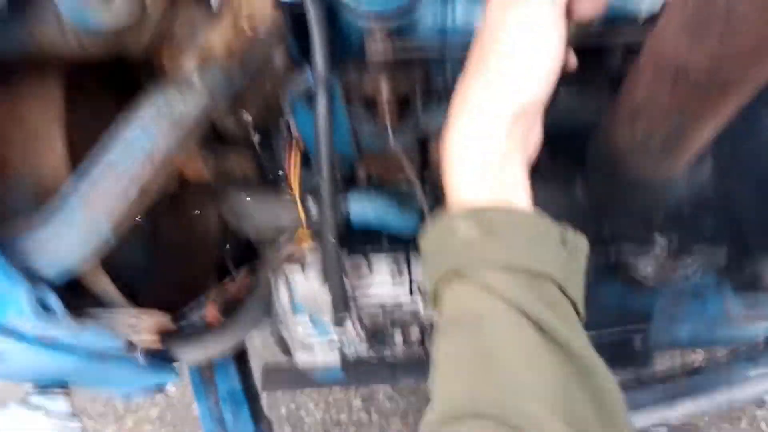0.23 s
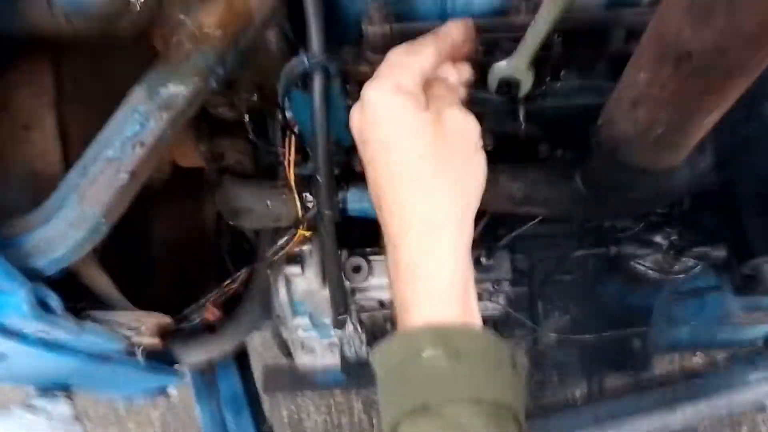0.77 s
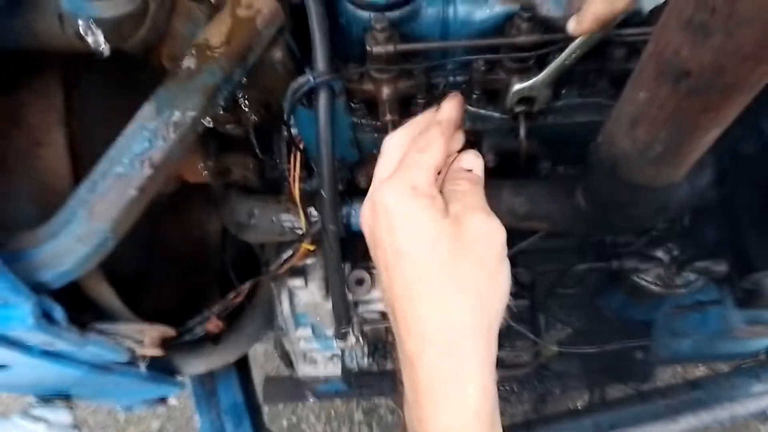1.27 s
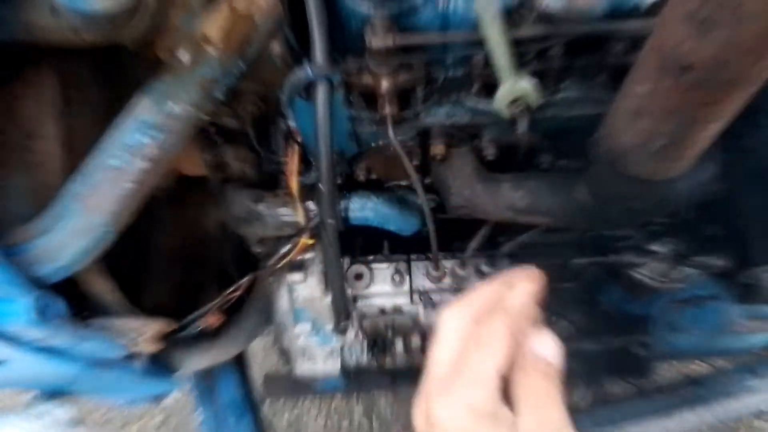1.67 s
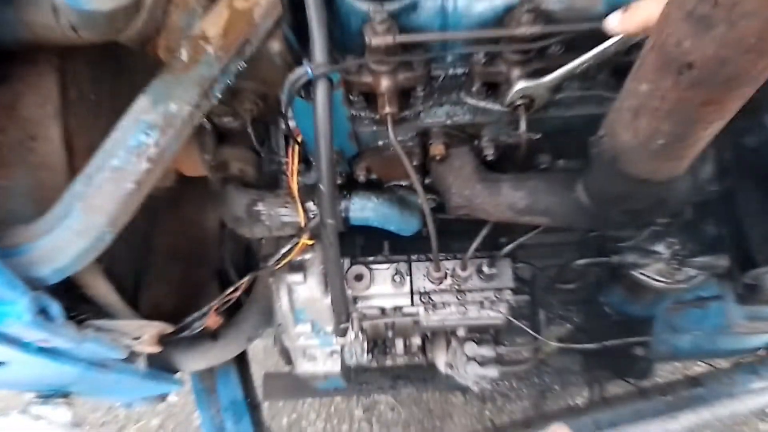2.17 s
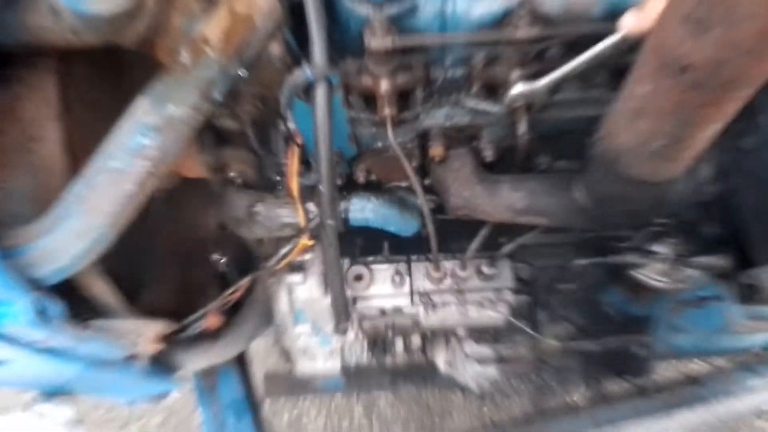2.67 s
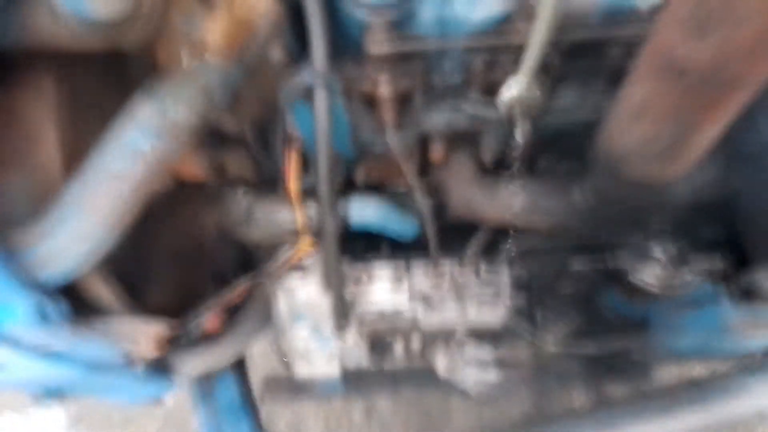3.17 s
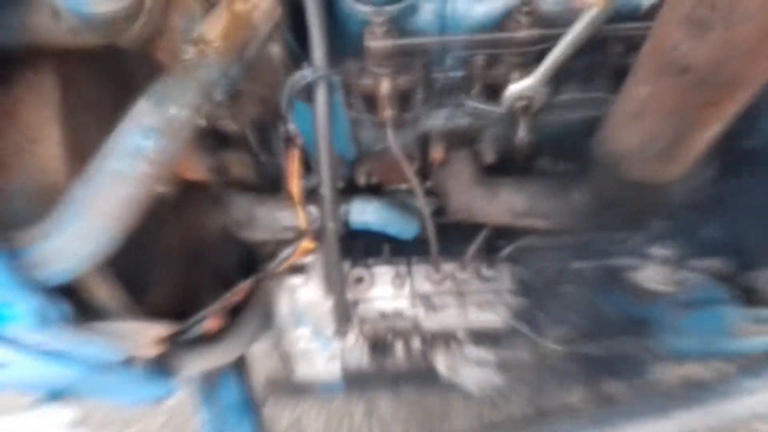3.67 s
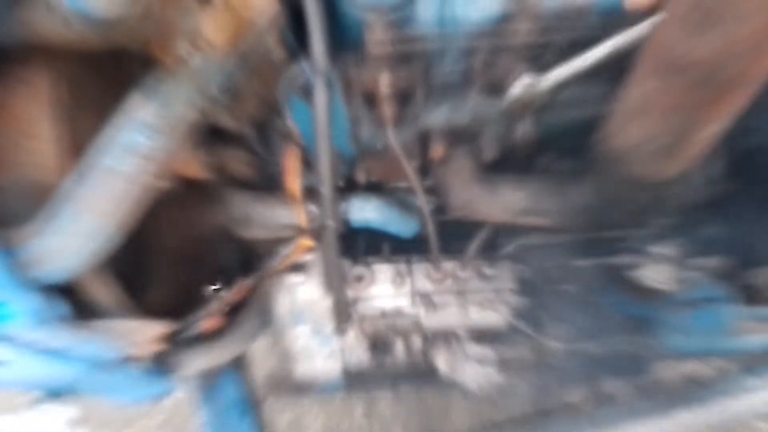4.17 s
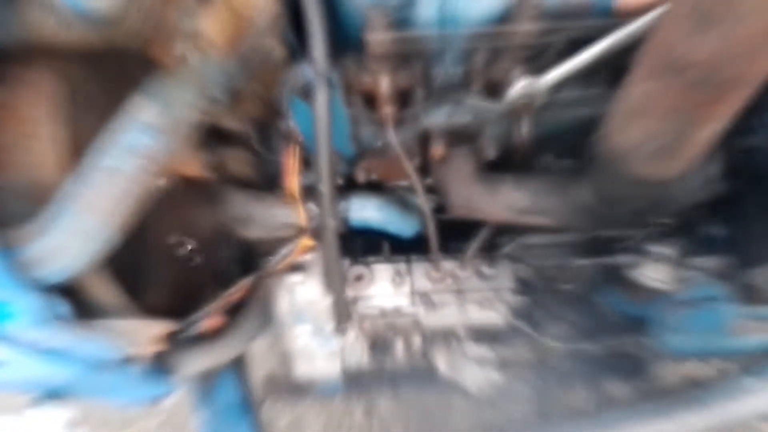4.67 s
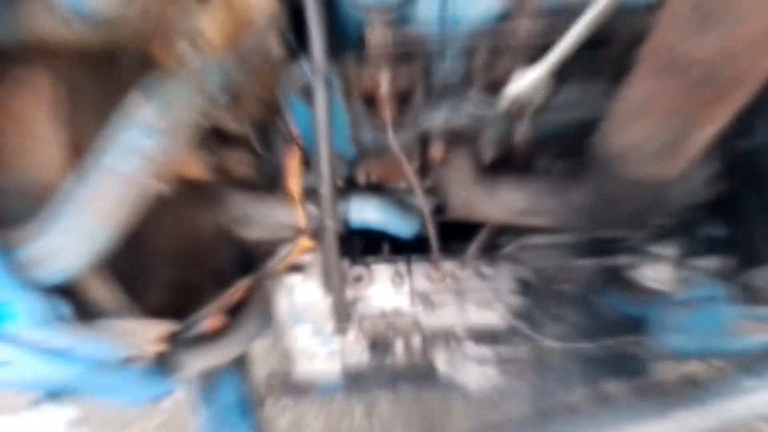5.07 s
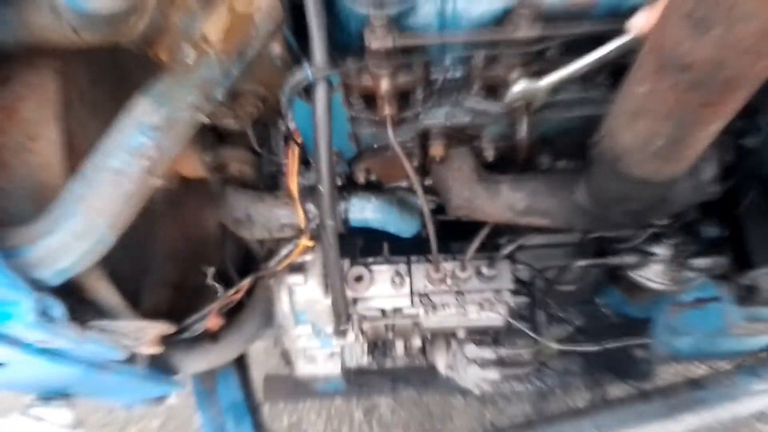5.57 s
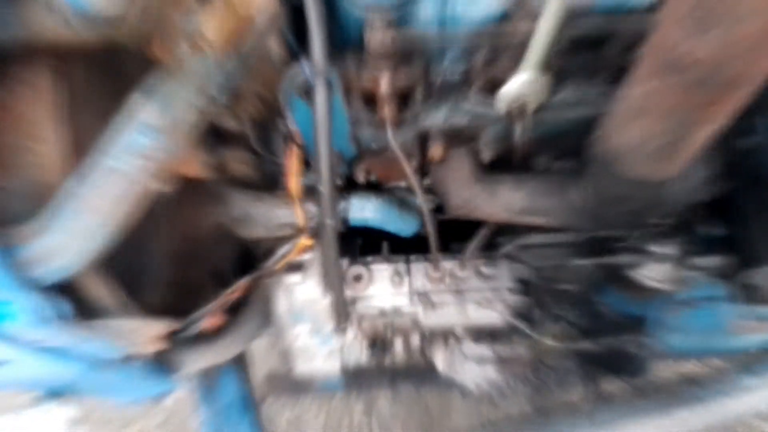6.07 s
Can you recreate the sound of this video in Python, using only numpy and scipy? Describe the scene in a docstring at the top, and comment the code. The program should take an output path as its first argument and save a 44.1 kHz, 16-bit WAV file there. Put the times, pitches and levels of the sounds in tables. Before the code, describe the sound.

A cold diesel catches on some cylinders: lopsided pairs of hard metallic clacks and hissy spits of fuel and gas, about three or four cycles a second. It accelerates steadily, with hollow knocks, pump housing rings and exhaust thumps crowding together. Then it hammers at nearly ten cycles a second, loose parts rattling, before dropping back a little. Handheld phone very close, no echo, slightly compressed treble.

```python
"""Old diesel starting, close up

A three-cylinder diesel catches on some cylinders, gathers speed and settles to idle, an arm's length from a phone.
In every cycle each cylinder clacks, spits gas and fuel and thumps the exhaust: shaped noise and struck modes.
Ignition knocks and pump rings strike modes at listed times; casing roar, loose parts and rumble run underneath.
Each of the two microphone ports has its own treble resonance."""
import sys
import numpy as np
from scipy import signal
from scipy.fft import rfft, irfft
from scipy.io import wavfile
from scipy.ndimage import uniform_filter1d

SR = 44100
rng = np.random.default_rng(int(sys.argv[2]) if len(sys.argv) > 2 else 0)


def dump(signal):
    """Clip the signal to [-1, 1] and save it as 16-bit WAV at the path in sys.argv[1]."""
    limited = np.clip(np.atleast_2d(signal).T, -1, 1)
    pcm = np.round(limited * 32767).astype(np.int16)
    wavfile.write(sys.argv[1], SR, pcm)


N = 278712

# levels in all tables are relative: each source sets its own gain afterwards
# stray ticks between strokes while the engine turns slowly: peak t/s, level/dB
TICKS = [(0.065, -29.5), (0.284, -28.5), (0.384, -30), (0.48, -25), (0.5942, -28), (0.601, -39),
         (0.691, -27.5), (0.778, -30), (0.9, -31), (0.991, -36), (1.211, -44), (1.448, -47), (1.824, -29.5)]
# steady running noise: t/s, casing roar level/dB, loose parts level/dB
RUNNING = [(0.0, -37.5, -38.5), (0.16, -45, -39), (0.28, -37, -31), (0.42, -42, -38.5), (1.67, -41, -38.5),
           (2.71, -37, -33.5), (3.08, -35.5, -29), (3.59, -32.5, -24.5), (4.4, -30, -21.5),
           (5.38, -31, -25), (6.32, -32, -24.5)]


def rattle():
    """Clacks, spits and ticks are flurries of tiny impacts: noise under blow envelopes, top treble set apart."""
    # blow shapes, a row per cylinder (one row for ticks): top treble level/dB over the blow, rise/s, length/s
    clack_shape = [(-41, 0.0027, 0.0083), (-17.5, 0.001, 0.0057), (-20, 0.0043, 0.0089)]
    spit_shape = [(-5, 0.0042, 0.0069), (-3.5, 0.0046, 0.0066), (-8.5, 0.004, 0.0088)]
    tick_shape = [(-9, 0.00037, 0.02)]
    # smear of the blows as the engine runs: t/s, added rise and length/s
    blur_s = [(0, 0.0026), (3.4, 0.00084), (4.3, 0), (4.9, 0.0075), (5.2, 0.00049), (6.32, 0)]
    # spectrum of the impacts: f/Hz, level/dB per Hz
    clatter = [(1000, 11), (2500, -0.5), (4000, -0.5), (6000, 5), (9000, 4.5), (12000, 2.5), (15000, -1.5)]
    # sharp openings: level over the blow, lead before its peak, shared length
    crack_db, crack_early_s = -1.5, 0.0025  # of a clack
    pop_db, pop_early_s = -4, 0.004  # of a spit
    opening_s = 0.0012

    (clack_s, clack_db), (spit_s, spit_db) = clacks(), spits()
    kinds = [(clack_s, clack_db, clack_shape), (spit_s, spit_db, spit_shape), (*np.transpose(TICKS), tick_shape)]
    blows = []
    for s, db, shapes in kinds:
        columns = np.broadcast_arrays(s, db, *np.transpose(shapes))
        blows.append(np.reshape(columns, (5, -1)))
    s, db, top_db, rise, length = np.hstack(blows)
    blur = np.clip(np.interp(s, *np.transpose(blur_s)), 0, 1)
    rise, length = rise + blur, length + blur

    body = bursts(s, db, rise, length, shape=1.32)
    body += undb(-24.0) * bursts(s, db, 0.0013, 0.022, shape=0.85)  # faint longer tail
    front_s = np.abs([clack_s - crack_early_s, spit_s - pop_early_s])
    front_db = np.array([clack_db + crack_db, spit_db + pop_db])
    front = bursts(front_s, front_db, 0.0004, opening_s, shape=0.76)
    body = np.hypot(body, front)
    top = undb(9.5) * bursts(s, db + top_db, rise, length, shape=1.6)
    top = np.hypot(top, undb(-1) * front)

    flurry, hail = 0, pair(grain_db=1.0)
    for hz, x in parts(colour(hail, clatter), 2603, patchy_db=3.5, rate=64):
        top_share = np.clip(np.log2(hz / 8000) / 0.18, 0, 1)
        flurry = flurry + x * ((1 - top_share) * body + top_share * top)
    return undb(-7.5) * flurry


def clacks():
    """Dull sharp valve clacks: times and levels."""
    return strokes((0, 0.345, 0.68), 0, first=1)  # share of the cycle, per cylinder


def spits():
    """Bright soft spits of leaking fuel and gas: times and levels, with a fixed lag of 3 ms."""
    return strokes((0.215, 0.55, 0.885), 0.003, first=4)


def strokes(share, late, first):
    """Times and levels of one kind of blow, cylinder after cylinder: arrays (cycles, 3)."""
    # engine cycles: start t/s, clack level/dB of cylinders 1 2 3, spit level/dB of 1 2 3
    cycles = [(-0.17, -60, -60, -43, -61, -31, -56), (0.1474, -24, -44, -47, -18.5, -22, -47),
              (0.4596, -22.5, -37, -37, -18.5, -20, -41), (0.754, -27.5, -34, -40, -26, -20.5, -53),
              (1.0387, -26, -34, -36, -18.5, -18, -61), (1.2923, -23, -28, -44, -17.5, -18.5, -54),
              (1.5268, -21.5, -28, -50, -15.5, -18, -55), (1.7428, -20, -24, -37, -17.5, -17.5, -60),
              (1.9458, -18.5, -20.5, -48, -15.5, -16.5, -59), (2.1332, -19.5, -20, -50, -28, -18.5, -61),
              (2.3156, -19, -18.5, -46, -22, -20, -56.5), (2.4944, -19, -19.5, -17, -19, -21.5, -17.5),
              (2.6647, -20, -20.5, -22, -18.5, -18.5, -16), (2.8249, -24, -17, -23, -18.5, -17.5, -23),
              (2.9642, -17, -21, -24.5, -16.5, -19, -38), (3.101, -15.5, -24, -37, -16, -19.5, -45),
              (3.2358, -17.5, -16, -31, -14.5, -22, -44), (3.367, -17.5, -21, -24, -13.5, -17.5, -34),
              (3.4949, -17.5, -17, -19.5, -15, -24, -16.5), (3.6088, -16.5, -16.5, -19.5, -18, -24, -15.5),
              (3.7306, -20, -22, -31, -14.5, -22, -46), (3.841, -16.5, -18, -27, -19, -21.5, -46),
              (3.9517, -16, -20, -24, -17, -24, -14.5), (4.058, -18, -23, -23, -22, -19.5, -14.5),
              (4.163, -15.5, -18, -18.5, -20, -22.5, -16), (4.267, -20, -25, -20, -26, -19.5, -16),
              (4.37, -21.5, -21, -22, -22, -30, -20), (4.47, -22, -23, -21, -31, -25, -21),
              (4.57, -23, -21.5, -24, -37, -32, -30), (4.67, -24, -21.5, -22, -29, -28, -37),
              (4.775, -24, -20, -24, -32, -28.5, -41), (4.878, -25, -20.5, -26, -33, -27, -43),
              (4.9812, -23, -17, -26, -36, -27, -24), (5.0874, -19, -19.5, -27, -26, -26, -28),
              (5.1959, -19.5, -18, -31, -27, -26, -46), (5.3063, -17.5, -19, -32, -27, -23, -43),
              (5.419, -17.5, -19, -34, -27, -25, -42), (5.5337, -17, -17.5, -16.5, -27, -29, -22),
              (5.65, -19.5, -17.5, -20, -22, -25, -36), (5.7649, -17.5, -18, -19.5, -18, -22, -19),
              (5.8793, -19.5, -18.5, -21, -19.5, -23, -19.5), (5.9916, -17, -18, -35, -19.5, -20.5, -46),
              (6.1027, -19, -21, -24.5, -16, -30, -44), (6.2136, -19, -17.5, -23.5, -20.5, -20.5, -60)]
    rows = np.array(cycles)
    start = rows[:, 0]
    span = np.diff(start, append=2 * start[-1] - start[-2])  # the last cycle lasts as long as the one before
    s = start[:, None] + span[:, None] * np.array(share) + late
    return np.clip(s, 0, (N - 1) / SR), rows[:, first:first + 3]


def clink():
    """Metal on metal: valve gear struck as clacks and ticks open; every blow finds its own few modes."""
    # modes of the valve gear: f/Hz, width/Hz, level/dB
    valves = [(3020, 87, -28), (3850, 68, -13.5), (4370, 70, -5), (5100, 130, -14), (5930, 75, 0.5),
              (6320, 80, -1), (7010, 140, 3), (7710, 86, 0), (8470, 66, 0), (9040, 91, 1), (9400, 97, -1.5),
              (10520, 160, -1.5), (11700, 110, -4), (12500, 130, -4)]
    clink_db, early_s = -11, 0.003  # over the blow, before the peak of a clack
    (clack_s, clack_db), (tick_s, tick_db) = clacks(), np.transpose(TICKS)
    s = np.hstack([np.abs(clack_s.ravel() - early_s), tick_s])
    db = np.hstack([clack_db.ravel(), tick_db + 3.0]) + clink_db
    return strike(s, db, valves, uneven_db=5.0, turn=0.9, rise=0.0002)


def knock():
    """Late ignition's pressure jump rings the cylinder head; the crankcase booms under blows and at listed times."""
    # ignition knocks in the cylinder head: t/s, peak level/dB, favoured ring f/Hz
    knocks = [(0.0373, -30, 2200), (0.1476, -31, 1870), (0.2537, -26.5, 2020), (0.4622, -28, 2170),
              (0.5626, -22.5, 2000), (0.858, -25.5, 2020), (1.0419, -30, 2310), (1.1268, -21.5, 2020),
              (1.2945, -29.5, 2140), (1.3443, -25.5, 1930), (1.3733, -18, 2200), (1.5214, -39, 1850),
              (1.5773, -28, 1700), (1.577, -28, 1910), (1.6003, -20.5, 2040), (1.7419, -32, 2130),
              (1.7905, -28, 1850), (1.8118, -15, 2400), (1.945, -34, 2130), (1.9929, -22, 2140),
              (2.0086, -21.5, 2380), (2.1315, -33, 1950), (2.194, -19, 2020), (2.3145, -45, 2350),
              (2.3567, -35, 2460), (2.376, -14.5, 2260), (2.5376, -29, 1920), (2.554, -13, 2400),
              (2.607, -28, 2300), (2.7187, -26, 2030), (2.803, -33, 2080), (2.8554, -29, 2210),
              (2.8703, -22, 2400), (2.9986, -22, 2340), (3.0106, -15, 2030), (3.1343, -24, 1780),
              (3.1472, -25, 2380), (3.265, -16, 2510), (3.2818, -14, 2380), (3.3964, -26, 2380),
              (3.5184, -28, 2680), (3.5763, -22, 2720), (3.5768, -20, 2440), (3.6431, -22, 2410),
              (3.6547, -22, 2440), (3.7539, -30, 2150), (3.8776, -20, 2030), (3.9759, -27, 2580),
              (3.9893, -26, 2430), (4.0248, -24, 1700), (4.0257, -17.5, 2430), (4.1312, -21, 2410),
              (4.2093, -27, 2090), (4.2348, -16, 2420), (4.3705, -23, 2360), (4.426, -24, 2600),
              (4.4367, -23.5, 1990), (4.5077, -31, 2080), (4.5356, -20, 2130), (4.6034, -32, 2350),
              (4.6355, -26, 2380), (4.8434, -30, 2410), (4.9122, -29, 2520), (5.0165, -23, 2070),
              (5.3425, -21.5, 2000), (5.4575, -19.5, 2080), (5.5727, -37, 2120), (5.6114, -27, 2420),
              (5.6757, -26, 1990), (5.6885, -26, 2410), (5.7264, -25.5, 2180), (5.8441, -21.5, 2430),
              (5.9075, -23.5, 2030), (5.9174, -19.5, 2430), (5.9555, -24, 2420)]
    # the loudest crankcase booms: t/s, peak level/dB, favoured ring f/Hz
    booms = [(0.525, -25, 900), (0.951, -29, 860), (1.098, -19.5, 1010), (1.376, -32, 904),
             (1.521, -29, 813), (1.58, -23, 1150), (1.742, -28, 918), (1.945, -28, 911), (1.988, -29, 1210),
             (2.134, -21, 870), (2.322, -24, 870), (2.374, -28, 886), (2.534, -22, 970), (2.612, -22, 845),
             (2.704, -17, 1240), (2.805, -28, 1140), (2.856, -20, 1150), (2.96, -22, 715),
             (2.995, -25, 1160), (3.053, -23, 927), (3.098, -24, 816), (3.135, -26, 673), (3.27, -23, 1210),
             (3.312, -28, 904), (3.403, -17, 1140), (3.452, -23, 721), (3.493, -27, 926),
             (3.523, -18, 1170), (3.682, -25, 1170), (3.704, -24, 832), (3.761, -19, 1170),
             (3.866, -26, 990), (3.937, -20, 853), (3.98, -19, 1030), (4.027, -25, 904), (4.194, -21, 1140),
             (4.318, -21, 837), (4.406, -19, 1190), (4.502, -25, 867), (4.814, -15.5, 1000),
             (4.869, -19, 721), (5.126, -26, 869), (5.287, -19, 826), (5.416, -34, 864), (5.535, -32, 902),
             (5.645, -30, 856), (5.684, -29, 894), (5.828, -24, 619), (5.864, -21, 818), (5.908, -20, 1120),
             (5.97, -23, 689), (6.06, -27, 931), (6.082, -28, 934), (6.21, -24, 832), (6.254, -28, 937)]
    # modes of the cylinder head: f/Hz, width/Hz, level/dB
    head_modes = [(1600, 380, 4), (1900, 71, 7), (2037, 77, 3.5), (2106, 130, 7.5), (2280, 97, 9.5),
                  (2395, 48, 4), (2510, 82, -6.5)]
    # modes of the crankcase: f/Hz, width/Hz, level/dB
    case_modes = [(705, 54, 2), (835, 49, 2.5), (909, 38, 2.8), (997, 60, 3.4), (1159, 122, 9.9),
                  (1280, 160, 4)]
    # boom over each blow, per cylinder, and its spread
    on_clack_db, on_spit_db, spread_db = (-13, -12.5, -30), (-12.5, -15, -27), 2
    rebound_s, rebound_db = 0.0085, -10.5  # the piston slaps back: lag, level over the knock

    (s, db, hz), (loud_s, loud_db, loud_hz) = np.transpose(knocks), np.transpose(booms)
    (clack_s, clack_db), (spit_s, spit_db) = clacks(), spits()
    boom_s = np.hstack([clack_s.ravel(), spit_s.ravel()])
    boom_db = np.hstack([scatter(clack_db + on_clack_db, spread_db), scatter(spit_db + on_spit_db, spread_db)])
    hail = pair(grain_db=1.5)

    head = undb(-9.0) * ring(hail * bursts(s + 0.0032, db, 0.0015, 0.013, shape=0.58), head_modes)
    hit_s = np.hstack([s, s + rebound_s])
    hit_db = np.hstack([db, scatter(db + rebound_db, 2.0)])
    head += undb(-1.5) * strike(hit_s, hit_db, head_modes, uneven_db=-0.5, turn=1.0, rise=0.0012,
                                near_hz=np.hstack([hz, hz]))

    case = undb(-8.5) * ring(hail * bursts(boom_s + 0.0026, boom_db, 0.0017, 0.013, shape=0.98), case_modes)
    case += undb(-6.5) * strike(boom_s, boom_db, case_modes, uneven_db=3.0, turn=0.52, rise=0.0022)
    case += undb(-3.0) * strike(loud_s, loud_db, case_modes, uneven_db=-1.0, turn=0.28, rise=0.0018,
                                near_hz=loud_hz)
    return head + case


def exhaust():
    """Gas pulses ring the pipe and gush on for a moment; every spit thumps a little."""
    # the loudest exhaust thumps: t/s, peak level/dB, favoured ring f/Hz
    thump_list = [(0.111, -26.5, 503), (0.215, -20, 302), (0.268, -25.5, 420), (0.523, -23, 304),
                  (0.723, -36, 326), (1.299, -32, 350), (1.41, -31, 334), (1.533, -34, 345),
                  (1.573, -30, 269), (1.637, -28.5, 326), (1.79, -34, 320), (1.915, -35, 366),
                  (1.993, -27, 334), (2.108, -37, 338), (2.198, -30, 331), (2.323, -32, 339),
                  (2.474, -32, 363.5), (2.535, -24, 333), (2.744, -33, 342), (2.792, -35, 326),
                  (2.851, -33, 269), (2.996, -25, 355), (3.134, -23, 339), (3.271, -26, 343),
                  (3.323, -24, 347), (3.404, -28, 355), (3.451, -27, 361), (3.588, -26, 323),
                  (3.636, -27, 388), (3.71, -27, 355), (3.862, -31, 301), (4.042, -25, 342),
                  (4.087, -26, 393), (4.19, -19, 366), (4.292, -24, 312), (4.51, -31, 347),
                  (4.616, -24, 347), (4.895, -31, 571), (5.131, -30, 466), (5.234, -39, 310),
                  (5.29, -27, 358), (5.554, -27, 374), (5.679, -24, 340), (5.746, -33, 256),
                  (5.79, -22, 302), (5.859, -30, 275), (5.905, -28, 345), (5.973, -29, 339),
                  (6.13, -27.5, 326), (6.245, -23, 343)]
    # modes of the exhaust pipe: f/Hz, width/Hz, level/dB
    pipe = [(278, 44, 4.1), (331, 46.5, 5.9), (396, 60, 5.5), (454, 80, 3.7), (518, 79, 4.5)]
    (spit_s, spit_db), (loud_s, loud_db, loud_hz) = spits(), np.transpose(thump_list)
    s, db = spit_s.ravel(), scatter(spit_db - 13.5, 2.5)
    gush_s = np.hstack([s, loud_s]) + 0.0014
    gush_db = np.hstack([db, loud_db])
    gush = ring(pair() * bursts(gush_s, gush_db, 0.0034, 0.026, shape=0.32), pipe)
    puffs = strike(s, db, pipe, uneven_db=2.0, turn=0.21, rise=0.0037)
    thumps = strike(loud_s, loud_db, pipe, uneven_db=1.5, turn=0.11, rise=0.0043, near_hz=loud_hz)
    return undb(-21.5) * gush + undb(-5.0) * puffs + undb(4.0) * thumps


def housing():
    """The pump housing rings and buzzes when a plunger lands hard: struck modes and ringing noise."""
    # rings of the pump housing: t/s, peak level/dB, favoured ring f/Hz
    rings = [(0.3183, -32, 2800), (0.4579, -42, 3000), (1.1707, -36, 2940), (1.3329, -46, 3050),
             (1.5736, -37, 3010), (1.6407, -37, 2780), (1.7914, -26, 3040), (1.9904, -28, 3080),
             (2.0504, -26, 3080), (2.1904, -41, 3120), (2.379, -26, 2870), (2.4154, -27, 3020),
             (2.5351, -31, 2860), (2.5905, -28, 3070), (2.7026, -23, 3230), (2.7541, -29, 3130),
             (2.804, -32, 3070), (2.8569, -33, 3040), (2.9027, -27, 3160), (2.9517, -31, 2880),
             (3.1348, -29, 2730), (3.3134, -25, 3080), (3.3966, -21.5, 3250), (3.5233, -21.5, 2800),
             (3.563, -23, 3040), (3.6857, -24.5, 3070), (3.7204, -28, 3070), (3.755, -29, 2980),
             (3.7933, -29, 3110), (3.907, -29, 3090), (4.018, -28, 3060), (4.0876, -24, 3040),
             (4.1914, -24, 3100), (4.2946, -33, 3060), (4.363, -23.5, 3090), (4.3939, -30, 3040),
             (4.462, -28, 3070), (4.561, -23.5, 3040), (4.71, -28, 3000), (5.7189, -27, 2860),
             (5.841, -26, 2900), (5.8726, -24, 2870), (5.909, -29, 3010), (5.9449, -26.5, 2970),
             (6.0192, -25, 2870)]
    # modes of the pump housing: f/Hz, width/Hz, level/dB
    pump = [(2870, 48, 8), (3110, 45, 10), (3360, 200, -17)]
    s, db, hz = np.transpose(rings)
    buzz = ring(pair(grain_db=-5.0) * bursts(s + 0.0032, db, 0.002, 0.016, shape=1.0), pump)
    tones = strike(s, db, pump, uneven_db=-2.0, turn=1.0, rise=0.0013, near_hz=hz)
    return undb(-12.5) * buzz + undb(-5.0) * tones


def chatter():
    """Tappets, gears and slack bearings knock the casing panels at random moments, following the roar level."""
    # modes of the casing panels: f/Hz, width/Hz, level/dB
    panels = [(501, 98, -5), (605, 75, -8.5), (722, 57, -5), (830, 69, -7), (916, 113, -2),
              (1025, 78, -8.5), (1351, 114, -9), (1642, 67, -7), (1814, 98, -4), (2010, 136, -1.5),
              (2412, 92, -5), (2797, 55, -9), (3035, 76, -11), (4290, 83, -11)]
    per_s, over_roar_db, spread_db = 330, -3, 3.5
    s = rng.random(int(per_s * N / SR)) * (N - 1) / SR
    roar_db = along(RUNNING, column=1)[(s * SR).astype(int)]
    db = scatter(roar_db + over_roar_db, spread_db)
    return strike(s, db, panels, uneven_db=4.0, turn=0.45, rise=0.0008)


def running():
    """Coarse roar of the casing panels and fine patchy rattle of fan, belt and loose parts, as band noise."""
    # spectrum of the casing roar: f/Hz, level/dB per Hz
    roar_spectrum = [(260, -12), (450, 1.5), (601, 8), (708, 6), (900, 12.5), (1060, 5), (1490, 11),
                     (1680, -10), (2080, 5.5), (3470, -34), (4500, -24), (5850, -66), (9900, -120)]
    # spectrum of the loose parts: f/Hz, level/dB per Hz
    loose_spectrum = [(2000, 6), (3500, -1), (5000, -2), (7000, -3), (10000, 0), (12000, -6), (15000, -6.5)]
    roar_noise = colour(pair(grain_db=-0.5), roar_spectrum)
    roar = sum(x for _, x in parts(roar_noise, 524, patchy_db=-1.5, rate=57))
    loose_noise = colour(pair(grain_db=3.0), loose_spectrum)
    loose = sum(x for _, x in parts(loose_noise, 2675, patchy_db=8.5, rate=90))
    roar = undb(-7.5) * roar * undb(along(RUNNING, column=1))
    return roar + undb(-12.0) * loose * undb(along(RUNNING, column=2))


def rumble():
    """A flickering exhaust rumble with faint wavering tones on multiples of the firing rate."""
    # exhaust rumble: t/s, level/dB
    rumble_level = [(0.0, -43), (0.4, -43.5), (0.88, -42.5), (0.96, -49), (1.1, -43), (2.44, -45),
                    (2.6, -42), (3.3, -40.5), (4.3, -40), (5.2, -40.5), (6.32, -40.5)]
    # spectrum of the rumble: f/Hz, level/dB per Hz
    lows = [(20, -27), (45, -32), (100, -20), (130, -17), (165, -26), (200, -12), (250, -4.5), (335, 2.5),
            (460, -7), (600, -15), (900, -51)]
    # firing rate once all cylinders catch: t/s, f/Hz, hum level/dB
    firing = [(2.9, 20.8, -84), (3.3, 23.8, -72), (3.8, 26.6, -73), (4.14, 28.64, -69), (4.5, 29.7, -67),
              (4.9, 29.2, -67), (5.3, 26.9, -72), (5.6, 26.55, -73), (6.32, 26.9, -72)]
    # exhaust hum: multiple of the firing rate, level/dB
    orders = [(2, 1.5), (3, 4.5), (4, 3), (5, 0)]
    turns = 2 * np.pi * np.cumsum(along(firing, column=1)) / SR
    hum = sum(undb(db + 2.5 * walk(4)) * np.sin(k * turns + 7 * rng.random()) for k, db in orders)
    noise = colour(pair(), lows) * undb(along(rumble_level, column=1) + 1.36 * walk(25))
    return noise + hum * undb(along(firing, column=2))


def strike(start, db, modes, uneven_db, turn, rise, near_hz=None):
    """Struck modes: each takes its own share of a blow, swells in rise s, meets the ports in its own phase."""
    focus_db = 49  # a blow favours the modes near where it lands: loss per octave away
    out, at = 0, (start * SR).astype(int)
    for hz, width, mode_db in modes:
        share, phase, lean = rng.standard_normal((len(at), 3)).T
        if near_hz is not None:
            mode_db = mode_db - focus_db * np.abs(np.log2(hz / near_hz))
        angle = 0.57 * phase + turn * np.array([lean, -lean])  # radians at left, right
        blow = np.zeros((2, N), complex)
        blow[:, at] = undb(db + mode_db + uneven_db * share) * np.exp(1j * angle)
        # two complex poles: the slow decay minus a faster one gives the swell
        slow = np.exp((2j * hz - width) * np.pi / SR)
        fast = slow * np.exp(-1 / (rise * SR))
        out = out + signal.lfilter([0, slow - fast], np.poly([slow, fast]), blow).imag
    return out


def bursts(peak, db, rise, length, shape):
    """Envelope of blows that swell to a peak and die; their powers add."""
    lead = SR // 40
    power, t = np.zeros(N + 4 * lead), np.arange(-lead, 3 * lead) / SR
    for s, d, r, l in np.broadcast(peak, db, np.clip(rise, 2e-4, 1), np.clip(length, 1e-3, 1)):
        fall = np.where(t < 0, (np.abs(t) / r) ** 3, (np.abs(t) / l) ** shape)
        power[int(s * SR):][:len(t)] += undb(2 * d) * np.exp(-2 * fall)
    return np.sqrt(power[lead:N + lead])


def scatter(db, spread_db):
    """Each blow a little louder or softer than its rule."""
    return (db + spread_db * rng.standard_normal(np.shape(db))).ravel()


def parts(x, low_hz, patchy_db, rate):
    """Splits x among rods, covers and pipes, each ringing louder or softer in its own time: (Hz, sound)."""
    return [(hz, band(x, hz, hz / 7) * undb(patchy_db * walk(rate))) for hz in low_hz * 1.16 ** np.arange(13)]


def ring(x, modes):
    """x rings a body; scaled so that steady white noise of rms 1 comes out near rms 1."""
    power = sum(undb(2 * db) * np.pi * width / SR for _, width, db in modes)
    return sum(undb(db) * band(x, hz, width) for hz, width, db in modes) / np.sqrt(power)


def band(x, hz, width):
    """One resonance, gain 1 at the centre."""
    return signal.lfilter(*signal.iirpeak(hz, hz / width, SR), x)


def pair(grain_db=0.):
    """Noise at two ports, alike in the bass; grain makes it a hail of uneven tiny impacts."""
    # how alike left and right are: f/Hz, likeness (0-1)
    likeness = [(60, 0.45), (290, 0.91), (640, 0.68), (1400, 0), (3000, 0), (12000, 0.06)]
    mid, side = rfft(rng.standard_normal((2, N)) * undb(grain_db * walk(900)))
    alike = np.clip(over_hz(likeness), 0, 1)
    mid, side = mid * np.sqrt(1 + alike), side * np.sqrt(1 - alike)
    return unit(irfft(np.array([mid + side, mid - side]), N))


def colour(x, table):
    """Shapes x by a spectrum and scales it to rms 1."""
    return unit(irfft(rfft(x) * undb(over_hz(table)), N))


def walk(rate):
    """Random levels held 1 / rate s and slewed twice."""
    k = int(SR / rate)
    steps = np.repeat(rng.standard_normal(N // k + 1), k)
    return 0.89 * uniform_filter1d(uniform_filter1d(steps, k), k)[:N]


def along(table, column):
    """A column of a curve at every sample."""
    rows = np.array(table)
    return np.interp(np.arange(N) / SR, rows[:, 0], rows[:, column])


def over_hz(table):
    """A (Hz, value) table at every frequency bin, on a log frequency scale."""
    hz, value = np.transpose(table)
    return np.interp(np.log(np.fft.rfftfreq(N, 1 / SR) + 1), np.log(hz), value)


def undb(db):
    """Gain of a level in dB."""
    return 10 ** (np.asarray(db) / 20)


def unit(x):
    """Scaled to rms 1."""
    return x / np.sqrt(np.mean(x ** 2))


def scene():
    """All parts of the engine, close and dry; the struck parts and exhaust pulses radiate no deep bass."""
    struck = rattle() + clink() + chatter() + knock() + housing() + exhaust()
    bass_cut = signal.butter(4, 239, "high", fs=SR, output="sos")  # Hz
    return signal.sosfilt(bass_cut, struck) + running() + rumble()


def record(dry):
    """Each microphone port lifts its own treble band; the phone rounds peaks and cuts the top."""
    # treble resonance of the left, then the right port: f/Hz, width/Hz, boost/dB
    ports = [(7340, 905, 15), (10580, 820, 12)]
    dip_hz, dip_width_hz, dip_db = 10700, 5900, -4  # the left port is duller at the very top
    left_late_s, top_hz = 0.00009, 14150  # the engine stands nearer the right port
    left, right = (x + (undb(db) - 1) * band(x, hz, width) for x, (hz, width, db) in zip(dry, ports))
    left = left + (undb(dip_db) - 1) * band(left, dip_hz, dip_width_hz)
    left = undb(-1.0) * np.roll(left, round(left_late_s * SR))
    rounded = np.tanh(2.3 * np.array([left, right])) / 2.3
    return signal.sosfilt(signal.ellip(9, .3, 58, top_hz, fs=SR, output="sos"), rounded)


dry = scene()
out = record(dry)
dump(out)
```